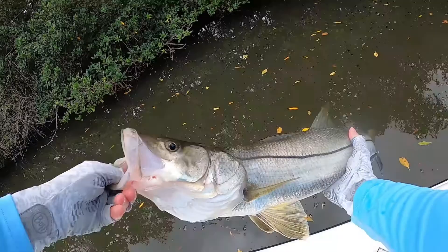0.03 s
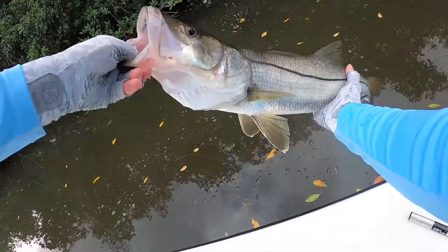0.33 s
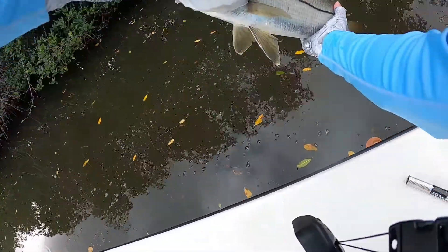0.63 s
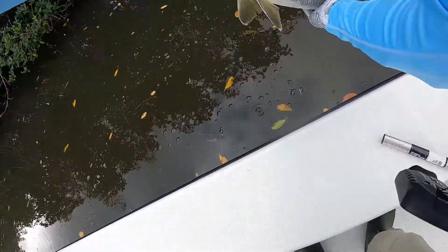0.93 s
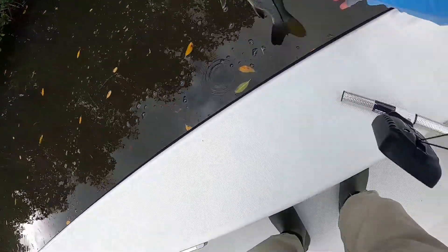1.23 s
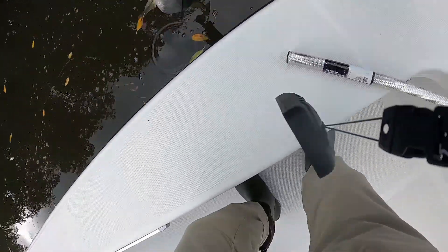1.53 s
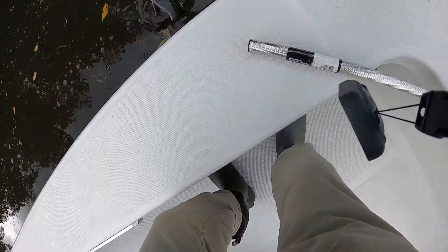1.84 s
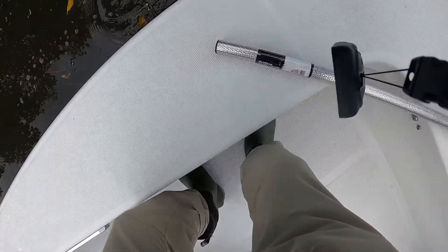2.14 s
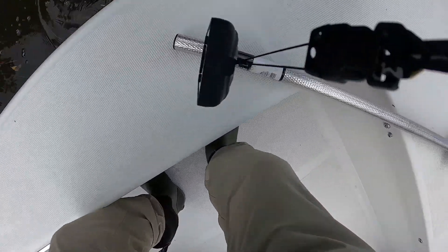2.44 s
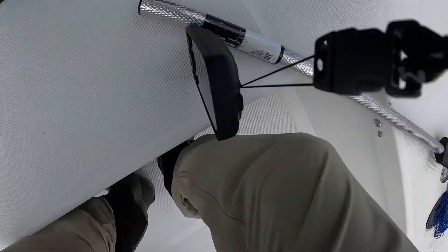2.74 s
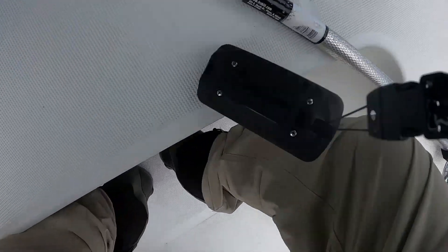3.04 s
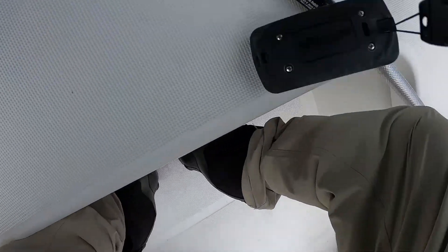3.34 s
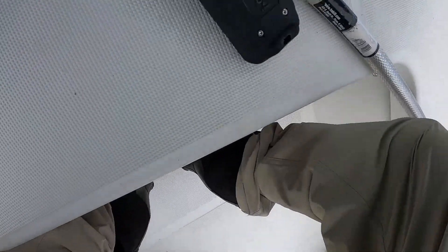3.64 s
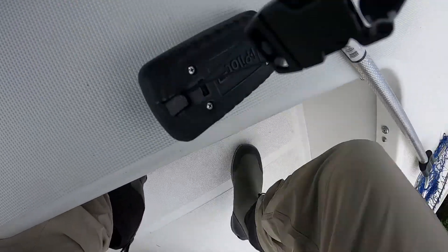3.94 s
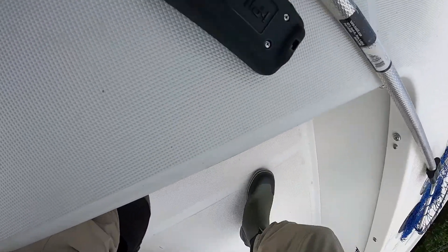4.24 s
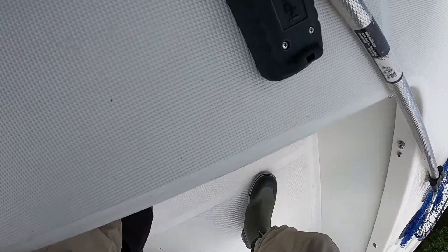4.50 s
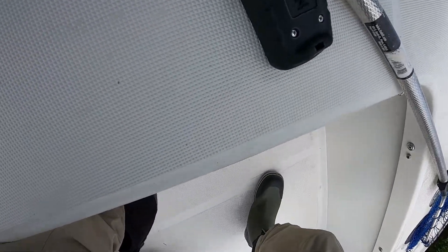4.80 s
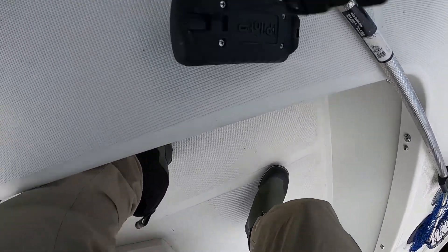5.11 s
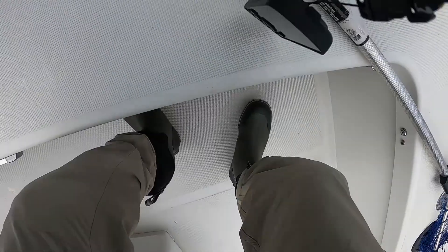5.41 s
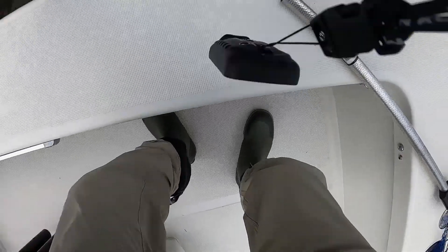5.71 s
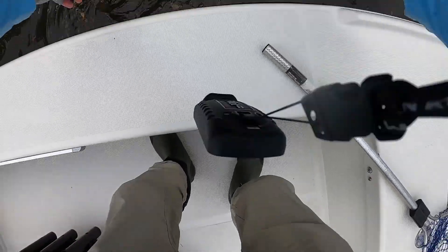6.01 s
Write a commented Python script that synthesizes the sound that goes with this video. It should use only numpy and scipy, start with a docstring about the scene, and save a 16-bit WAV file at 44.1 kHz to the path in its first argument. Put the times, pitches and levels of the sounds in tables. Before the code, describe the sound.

A light breeze and a murmuring creek surround a small boat, with faint clothing rustle and ticks of hanging gear close to the microphone. A rubber boot skids briefly on the wet deck, then knees and boots land in a cluster of loud hollow thumps. More knocks follow with short sole squeaks and soft gurgles beside the hull, and one sharp thump comes near the end.

```python
"""Angler in a small boat

In a sheltered creek a rubber boot skids, hissing, over a wet fibreglass deck; soles squeak by stick-slip.
Knees and boots thump the hollow hull into its normal modes, and bubbles resonate beside the boat.
Sleeves brush and gear ticks close to a microphone worn on the chest, all over a light breeze."""
import sys
import numpy as np
from scipy import signal
from scipy.fft import rfft, irfft
from scipy.io import wavfile
from scipy.ndimage import uniform_filter1d

SR = 44100
rng = np.random.default_rng(int(sys.argv[2]) if len(sys.argv) > 2 else 0)


def persist_wave(psi):
    """Save psi, clipped to +-1, as 16-bit WAV."""
    counts = np.round(np.clip(psi, -1, 1) * 32767).astype(np.int16)
    wavfile.write(sys.argv[1], SR, np.atleast_2d(counts).T)


N = 271611

# blows on the hull: t/s, level/dB, flex f/Hz, panel f/Hz, panel level re flex/dB, slap level/dB
BLOWS = [(0.465, -26, 134, 86, 1, -59), (0.552, -33.5, 190, 110, -4, -62),
         (2.7674, -4.5, 220, 120, -14, -39), (2.7693, -11.5, 463, 460, -18, -50),
         (2.769, -23, 49, 65, -7, -59), (2.776, -18.5, 540, 593, -7, -31), (2.802, -18.5, 420, 227, 1, -36),
         (2.836, -7, 362, 520, -7, -21.5), (2.852, -16, 338, 150, 6.5, -44),
         (2.87, -3, 250, 190.3, -1.5, -30.5), (2.918, -5, 198, 222, -11, -40),
         (3.159, -26, 210, 171, -1.5, -50), (3.171, -26, 203, 175, 2, -65),
         (3.2459, -30.5, 194, 100, -16, -58), (3.343, -30, 200, 171, 1, -39),
         (3.5151, -22.5, 179, 173.7, 5, -58), (3.597, -27.5, 203, 140, -17, -67),
         (3.6845, -8.5, 274, 156, -1, -31.5), (3.6966, -21, 210, 91, -13, -57),
         (3.7088, -11, 312, 184.5, 3.5, -38), (3.71, -18.5, 655, 600, -14, -61),
         (3.7356, -16.5, 247, 188, -2, -40), (3.778, -19, 194, 178, -3, -60),
         (3.8271, -17, 222, 182, -3, -25), (3.885, -26, 173, 146, 11.5, -33),
         (3.9193, -14, 264, 228.7, -10, -29.5), (3.933, -24, 266, 171, -27, -52),
         (3.949, -25.5, 227, 139, -22, -46), (4.0486, -12, 202, 181, -14, -35),
         (4.086, -19.5, 230, 142, 0.5, -33), (4.1445, -17, 213, 167.6, -3.5, -53),
         (4.2369, -19.5, 197, 168.3, -2, -54), (4.545, -16.5, 255, 237, -3, -33),
         (5.6155, -3.5, 229, 136, -12, -13.5), (5.629, -20, 260, 183, -12, -52)]
# normal modes of the hollow deck and hull: f/Hz, relative level/dB, T60/s
HULL_MODES = [(83, 6, 0.087), (133.7, 5, 0.21), (163.4, 6, 0.2), (182.7, 5.5, 0.27), (227, -3, 0.092),
              (241.6, -6, 0.21), (299, 3, 0.073), (365, -12, 0.085), (452, 4.5, 0.057), (506, 1.5, 0.11),
              (664, -5.5, 0.22)]
# spectrum of a sole's slap: f/Hz, level/dB
SLAP_SPECTRUM = [(200, -25), (450, 5.5), (700, 5.5), (1100, 3), (1700, -7.5), (2500, -0.5), (3400, -1.5),
                 (4200, -6), (5500, -16.5), (6500, -13), (8000, -34), (15000, -53)]
# jolts that shake the gunwale fittings: t/s, level/dB
JOLTS = [(2.7693, -14.5), (2.836, -22.5), (3.685, -36.5), (3.7083, -39), (4.545, -45)]
# modes of those fittings: f/Hz, relative level/dB, T60/s
FITTING_MODES = [(963, 4, 0.036), (988, -5.5, 0.14), (1085, 8.5, 0.029), (1300, -9.5, 0.093),
                 (2243, -3, 0.057)]
# the boot speeds up, drags on and stops against the hull: t/s, level/dB, chatter f/Hz
SKID_PATH = [(2.59, -83, 797), (2.635, -44, 827), (2.66, -31, 859), (2.685, -25.5, 877),
             (2.722, -25.5, 907), (2.737, -30, 887), (2.776, -28.5, 742), (2.81, -48, 680),
             (2.87, -99, 696)]
# spectrum of the wet sole's hiss: f/Hz, level/dB
SKID_SPECTRUM = [(300, -3), (600, -27), (950, -10.5), (1700, 1), (2600, 1.5), (3100, -3.5), (3650, -2),
                 (4300, -6), (6500, -9.5), (9000, -17), (15500, -34.5)]
# harmonics of its chatter, from the fundamental up: level/dB
CHATTER_HARMONICS = [-21, -2.5, 9.5, 6.5, -11]
# squeaks of a sole: t/s, duration/s, first slip f/Hz, last slip f/Hz, level/dB, roll-off/(dB per octave)
SQUEAKS = [(2.644, 0.031, 1726, 1625, -40, 16), (2.678, 0.035, 3560, 3720, -33.5, 20),
           (2.7, 0.035, 2540, 2650, -39, 22), (2.712, 0.015, 1850, 1940, -31, 18),
           (3.883, .028, 2960, 3640, -40.5, 11), (4.05, .027, 652, 604, -22.5, 14),
           (4.072, 0.045, 608, 500, -38.5, 11), (4.116, .031, 474, 236, -26, 20),
           (4.387, 0.0217, 1320, 1260, -48, 18), (4.437, 0.025, 1350, 1616, -48.5, 17)]
# single bubbles beside the hull: t/s, starting f/Hz, peak level/dB, upward glide/octaves
PLOPS = [(2.913, 2400, -36, .1), (2.942, 636, -35.5, 0.16), (3.002, 1110, -41, .2),
         (3.089, 676, -41.5, 0.25), (3.103, 923, -43, 0.5), (3.103, 1770, -40, 0.00053),
         (3.231, 1080, -42, .55), (3.241, 1740, -40.5, 0.36), (4.622, 1080, -43.5, 0.34),
         (4.709, 1240, -40.5, -0.14), (4.798, 1710, -35.5, 0.28), (4.814, 2560, -45, .05),
         (4.911, 1130, -40.5, 0.2), (5.005, 2720, -41.5, -.1), (5.196, 2850, -43, .1)]
# bubble clouds: t/s, spread/s, rate/(1/s), level/dB, typical f/Hz, pitch spread/octaves
GURGLES = [(2.715, .026, 420, -34.5, 1607, 0.47), (2.989, .05, 220, -52, 1260, 0.37),
           (4.8, 0.075, 170, -52, 1126, .25), (4.801, .06, 150, -54.5, 2310, 0.29),
           (4.956, .022, 420, -46, 1415, 0.587), (6.13, 0.02, 700, -50, 1140, 0.49)]
# taps of hanging gear: t/s, level/dB, centre f/Hz
TICKS = [(1.828, -21.5, 3020), (3.945, -38, 5640), (2.07, -28, 2720), (2.125, -27.5, 2650),
         (2.156, -33, 6360), (2.871, -30, 6800), (2.968, -35.5, 5540), (3.211, -33, 2570),
         (3.217, -37, 4800), (3.744, -29, 2540), (4.878, -36, 2840)]
# strokes of cloth and rubber: peak t/s, rise/s, fall/s, level/dB, centre f/Hz, width/octaves
RUBS = [(0.246, .019, 0.021, -42, 2820, 0.45), (.284, 0.0078, 0.012, -44, 2650, 0.62),
        (0.476, .005, 0.011, -45, 5140, 0.97), (.498, 0.02, 0.019, -47, 4070, 0.67),
        (.524, 0.0064, 0.022, -44.5, 2000, 0.87), (1.88, 0.033, .04, -56, 5450, .9),
        (2.11, 0.011, 0.009, -45, 5000, 1.1), (2.61, 0.0081, 0.023, -39, 2300, 2.2),
        (3.15, 0.49, 0.6, -65, 7000, 1.9), (3.895, .014, 0.023, -40, 2270, 3.3),
        (3.902, 0.0093, 0.013, -38, 7050, 0.33), (4.149, 0.018, 0.023, -45.5, 4320, 0.69),
        (4.42, 0.39, 0.16, -57.5, 2790, .6), (4.439, 0.088, 0.09, -58.5, 6000, 0.14),
        (4.954, 0.052, 0.056, -56, 5770, 0.31), (6.135, .041, .022, -44, 1550, 0.79)]
# strength of the breeze in the mangroves: t/s, level/dB
WIND_LEVEL = [(0.0, -48.5), (2.43, -49), (2.81, -47.5), (3.1, -53.5), (3.55, -54), (3.93, -52),
              (4.7, -53.5), (6.16, -52)]
# airflow over the microphone, strongest while the angler moves: t/s, relative level/dB
BUFFET_LEVEL = [(0.0, -47), (0.15, -51), (.27, -55.5), (2.37, -61.5), (2.81, -52.5), (3.89, -43),
                (4.49, -56), (5.15, -54), (5.52, -50.5), (6.16, -58)]
# spectra of the leaves, the creek and the buffeting air: f/Hz, level/dB
LEAF_SPECTRUM = [(200, 2.5), (450, -11), (700, -1), (1100, 5.5), (1800, 2.5), (2600, -1.5), (4000, -7.5),
                 (6000, -13), (9000, -20.5), (10500, -28.5), (13000, -37), (15000, -62)]
CREEK_SPECTRUM = [(40, -7), (100, -2.5), (165, 0.5), (260, -5), (400, -8.5), (650, -12), (1100, -21.5),
                  (3000, -33.5), (8000, -77)]
BUFFET_SPECTRUM = [(12, -19), (28, -4.5), (65, -1), (110, -4), (220, -24), (800, -49), (8000, -62.5)]
# balance of the deck sounds, their treble a little to the right: f/Hz, left minus right/dB
DECK_BALANCE = [(200, 1.14), (550, 2.5), (1100, 2.5), (2200, 2), (4500, -1), (9000, -1)]
# balance of the water and mangroves, which lie to the left: f/Hz, left minus right/dB
BANK_BALANCE = [(200, 0.5), (600, 3.5), (2300, 6), (4500, 2), (9000, 1)]


def knocks(slap_s=0.0012, echo_db=-14, echo_s=0.01, hardness=0.11):
    """Impact excitation: knees and boots thump the hull, and a harder contact gives a brighter slap."""
    out, t = np.zeros((2, N)), clock(0.5)
    for s, db, flex_hz, panel_hz, panel_db, slap_db in BLOWS:
        tilt = hardness * (slap_db + 10)  # dB per octave
        spectrum = [(hz, level + tilt * np.log2(hz / 1000)) for hz, level in SLAP_SPECTRUM]
        envelope = onset(t, 0.00048) * (np.exp(-t / slap_s) + undb(echo_db) * np.exp(-t / echo_s))
        slap = envelope * noise(len(t), spectrum, apart_hz=5000)
        add(out, s, undb(db) * hull_thump(flex_hz, panel_hz, panel_db) + undb(slap_db) * slap)
    return out


def hull_thump(flex_hz, panel_hz, panel_db, sharpness=11, ring_db=-3, scatter_db=3.5, cavity_db=-9):
    """Modal response: one push flexes the deck; the panel underfoot, the hull and its cavity ring on."""
    t = clock(0.5)
    peak_s = 1.2 / flex_hz
    turn = 2 * np.pi * (t - peak_s)
    flex = (t / peak_s * np.exp(1 - t / peak_s)) ** sharpness * np.cos(flex_hz * turn)
    panel = onset(t, 0.015) * decay(t, t60=0.14) * np.cos(panel_hz * turn)
    body = np.zeros(len(t))
    for hz, db, t60 in HULL_MODES:
        # every spot on the deck drives the modes a little differently
        gain = undb(ring_db + db + scatter_db * rng.standard_normal())
        mode_hz = hz * (1 + 0.009 * rng.standard_normal())
        unity = 2 * np.log(1000) / (t60 * SR)  # scales the mode to a gain of one at resonance
        body += gain * unity * decay(t, t60) * np.cos(2 * np.pi * mode_hz * t)
    cavity = rng.standard_normal(len(t)) * decay(t, t60=0.27)
    body += undb(cavity_db) * cavity / np.linalg.norm(cavity)
    body *= 1 - np.exp(-t / 0.0012)  # the bending wave takes a moment to spread
    return flex + undb(panel_db) * panel + signal.fftconvolve(flex, body)[:len(t)]


def rattles(detune=0.044):
    """Free vibration: jolted fittings on the gunwale ring in damped, inharmonic modes."""
    out, t = np.zeros(N), clock(0.5)
    for s, db in JOLTS:
        for hz, mode_db, t60 in FITTING_MODES:
            mode_hz = hz * (1 + detune * rng.standard_normal())
            ring = onset(t, 0.00048) * decay(t, t60) * np.sin(2 * np.pi * mode_hz * t)
            add(out, s, undb(db + mode_db) * ring / 2)
    return out


def skid(jitter=0.055, hiss_db=-1, chatter_db=-7, grain_db=1):
    """Sliding friction: a wet sole hisses on the textured deck; its chatter rises in pitch with speed."""
    db, hz = curves(SKID_PATH)
    phase = phase_of(hz * (1 + jitter * walk(N, 1200)))
    chatter = unit(sum(undb(level) * walk(N, 150) * np.sin(k * phase)
                       for k, level in enumerate(CHATTER_HARMONICS, 1)))
    hiss = noise(N, SKID_SPECTRUM, apart_hz=3880)
    grain = unit(undb(grain_db * walk(N, 900)))
    return undb(db) * (undb(hiss_db) * hiss + undb(chatter_db) * chatter) * grain


def squeaks(jitter=0.026, shimmer_db=2, attack_s=0.0055, release_s=0.0054):
    """Stick-slip oscillation: a sole's pitch follows its speed, down to a groan as it comes to rest."""
    out = np.zeros(N)
    for s, length, first_hz, last_hz, db, rolloff_db in SQUEAKS:
        t = clock(length)
        hz = first_hz * (last_hz / first_hz) ** (t / length)
        phase = phase_of(hz * (1 + jitter * walk(len(t), 764)))
        tone = sum(undb(-rolloff_db * np.log2(k)) * np.sin(k * phase) / (1 + (k * hz / 9000) ** 6)
                   for k in range(1, 6))
        sliding = np.clip(np.minimum(t / attack_s, (length - t) / release_s), 0, 1)
        add(out, s, np.sqrt(2) * tone * sliding * undb(db + shimmer_db * walk(len(t), 217)))
    return out


def water(plop_cycles=16, gurgle_cycles=12, scatter_db=3, rise_octaves=0.089, pan_db=4):
    """Bubble resonance: plops and gurgles by the hull and under the sole; larger bubbles ring longer."""
    out = np.zeros((2, N))
    for s, hz, db, glide in PLOPS:
        add(out, s, undb(db) * bubble(hz, plop_cycles / hz, glide))
    for s, spread, rate, db, hz, octaves in GURGLES:
        deviations = np.clip(rng.standard_normal((int(3 * spread * rate), 5)), -2, 2)
        for when, height, loudness, glide, pan in deviations:
            pitch = hz * 2 ** (octaves * height)
            gain = undb(db + scatter_db * loudness + pan_db * pan * np.array([[1], [-1]]))
            ring = bubble(pitch, gurgle_cycles / pitch, rise_octaves * (1 + glide))
            add(out, s + spread * when, gain * ring)
    return out


def bubble(hz, ring_s, glide_octaves, swell=0.028, damping=1.8, wobble=0.011):
    """Volume pulsation: an air pocket rings, wobbles and glides in pitch as the water closes over it."""
    age = clock(2 * ring_s) / ring_s
    pitch = hz * 2 ** (glide_octaves * np.minimum(age, 1)) * (1 + wobble * walk(len(age), 700))
    envelope = (1 - np.exp(-age / swell)) * np.exp(-damping * age ** 2)
    return envelope / envelope.max() * np.sin(phase_of(pitch))


def ticks(decay_s=0.0028):
    """Damped resonance: plastic buckles and a hanging remote control tap, each in one narrow band."""
    out, t = np.zeros((2, N)), clock(0.052)
    tap = onset(t, 0.0005) * np.exp(-t / decay_s)
    for s, db, hz in TICKS:
        band = noise(len(t), resonance(hz, octaves=0.088, skirt_db=9), apart_hz=3000)
        add(out, s, undb(db) * tap * band / 2)
    return out


def rubs(grain_db=3.5):
    """Friction noise: sleeves, trousers and soles brush in grainy strokes that swell and fade."""
    out, t = np.zeros((2, N)), clock(0.5) - 0.2  # each stroke peaks at t = 0
    for s, rise, fall, db, hz, octaves in RUBS:
        stroke = np.exp(-(t / np.where(t < 0, rise, fall)) ** 2)
        grain = unit(undb(grain_db * walk(len(t), 900)))
        band = noise(len(t), resonance(hz, octaves), apart_hz=2400)
        add(out, s + t[0], undb(db) * stroke * grain * band)
    return out


def breeze(flutter_db=1, lap_db=2, gust_db=2.5, usual_wind_db=-51.5, murmur_growth=0.32):
    """Turbulent flow: leaves hiss, the creek murmurs with the wind, and gusts buffet the microphone."""
    (wind_db,), (buffet_db,) = curves(WIND_LEVEL), curves(BUFFET_LEVEL)
    leaves = noise(N, LEAF_SPECTRUM, apart_hz=1850) * undb(wind_db + 0.5 + flutter_db * walk(N, 13))
    murmur_db = wind_db + 3.5 + murmur_growth * (wind_db - usual_wind_db)
    murmur = noise(N, CREEK_SPECTRUM, apart_hz=1600) * undb(murmur_db + lap_db * walk(N, 12))
    buffet = noise(N, BUFFET_SPECTRUM, apart_hz=1010, least_width=0.16)
    buffet *= undb(buffet_db + 7 + gust_db * walk(N, 6.6))
    return leaves + murmur + buffet


def undb(db):
    """Amplitude ratio of a level in decibels."""
    return 10 ** (np.asarray(db) / 20)


def unit(x):
    """Normalisation to an rms of one."""
    return x / np.sqrt(np.mean(x ** 2))


def clock(seconds):
    """Time axis of one event."""
    return np.arange(int(seconds * SR)) / SR


def onset(t, rise_s):
    """Smooth growth from zero to one."""
    return 1 - np.exp(-(t / rise_s) ** 2)


def decay(t, t60):
    """Exponential damping, by 60 dB in t60 seconds."""
    return np.exp(-np.log(1000) * t / t60)


def phase_of(hz):
    """Phase as the time integral of frequency."""
    return 2 * np.pi * np.cumsum(hz) / SR


def curves(table):
    """Linear interpolation of each later column against the first, t/s."""
    s, *columns = np.transpose(table)
    return [np.interp(np.arange(N) / SR, s, column) for column in columns]


def add(out, s, sound):
    """Superposition of a sound starting at s seconds."""
    i = int(s * SR)
    out[..., i:i + sound.shape[-1]] += sound[..., :max(N - i, 0)]


def walk(n, rate):
    """Random modulation of unit rms, sliding to a new value rate times a second."""
    hold = max(int(SR / rate), 1)
    steps = np.repeat(rng.standard_normal(n // hold + 1), hold)
    return unit(uniform_filter1d(steps, hold)[:n])


def noise(n, spectrum, apart_hz, least_width=0.041):
    """Partially coherent stereo noise: the two sides grow unlike as frequency rises towards apart_hz."""
    f = np.fft.rfftfreq(n, 1 / SR) + 1
    hz, db = np.transpose(spectrum)
    mid, side = rfft(rng.standard_normal((2, n))) * undb(np.interp(np.log(f), np.log(hz), db))
    side *= np.clip(least_width + f / (f + apart_hz), 0, 1)
    return unit(irfft(np.array([mid + side, mid - side]), n))


def resonance(hz, octaves, skirt_db=12):
    """Resonance curve with the bass cut and the microphone's dull top, as rows of f/Hz, level/dB."""
    f = np.geomspace(50, SR / 2, 60)
    peak_db = -skirt_db * np.log10(1 + (np.log2(f / hz) / (octaves / 2)) ** 2)
    loss_db = 10 * np.log10(1 + (f / 8000) ** 6 + (500 / f) ** 4)
    return np.column_stack([f, peak_db - loss_db])


def place(x, balance, left_lag_s=0.00002):
    """Localisation by level and time differences between the left and right microphones."""
    f = np.fft.rfftfreq(N, 1 / SR)
    hz, db = np.transpose(balance)
    difference_db = np.interp(np.log(f + 1), np.log(hz), db)
    left = undb(difference_db / 2) * np.exp(-1j * np.pi * f * left_lag_s)
    return irfft(rfft(x) * np.array([left, 1 / left]), N)


def scene():
    """Superposition of close sources in the open air: the deck underfoot, the creek to the left."""
    deck = knocks() + rattles() + skid() + squeaks() + rubs() + ticks()
    return place(deck, DECK_BALANCE) + place(water() + breeze(), BANK_BALANCE)


def record(dry, ceiling=1.08, top_hz=15150):
    """Soft saturation rounds the loudest thumps, and a steep low-pass filter cuts the top."""
    lowpass = signal.ellip(8, 0.2, 70, top_hz, fs=SR, output="sos")
    return signal.sosfilt(lowpass, ceiling * np.tanh(dry / ceiling))


dry = scene()
out = record(dry)
persist_wave(out)
```